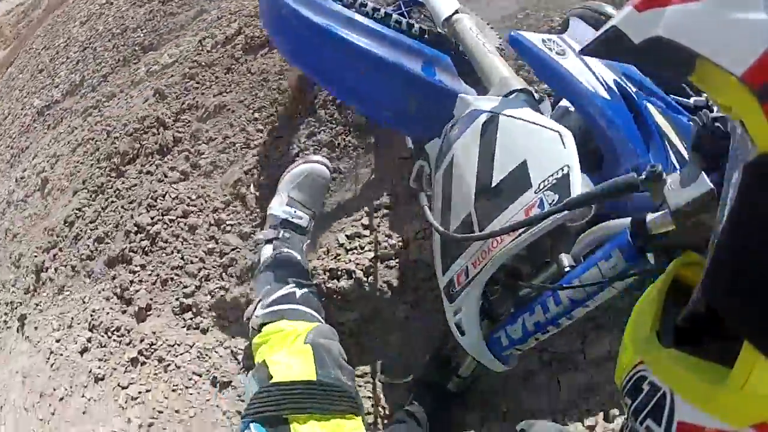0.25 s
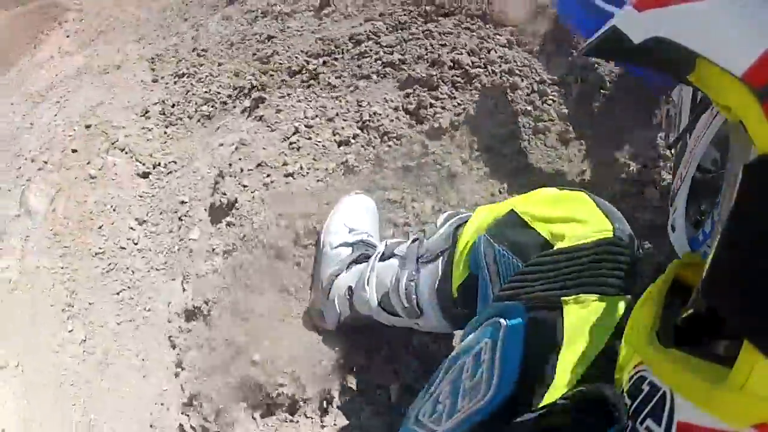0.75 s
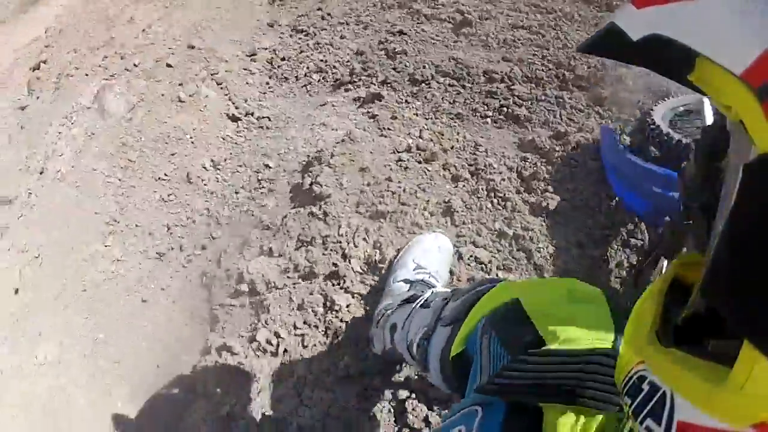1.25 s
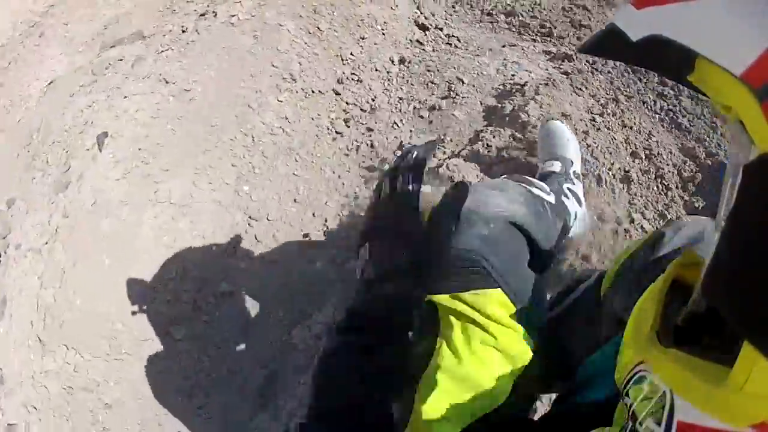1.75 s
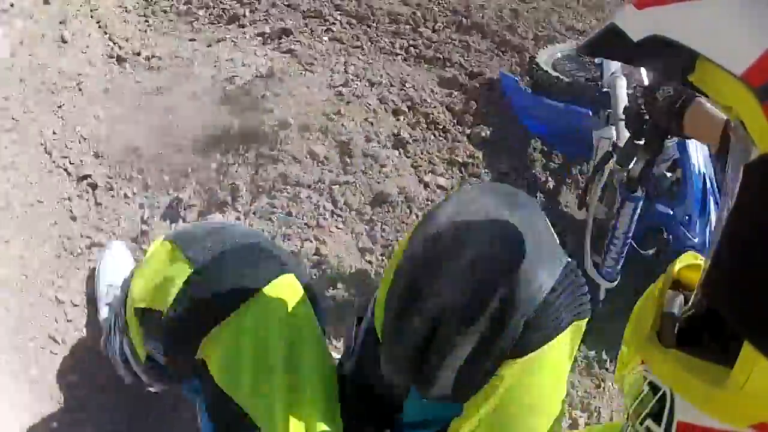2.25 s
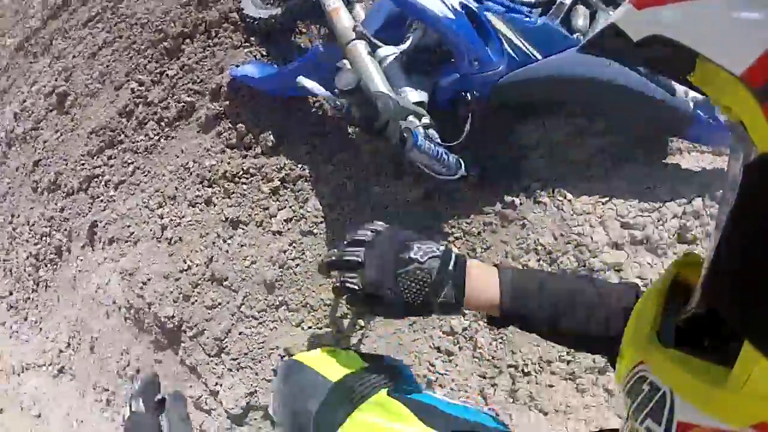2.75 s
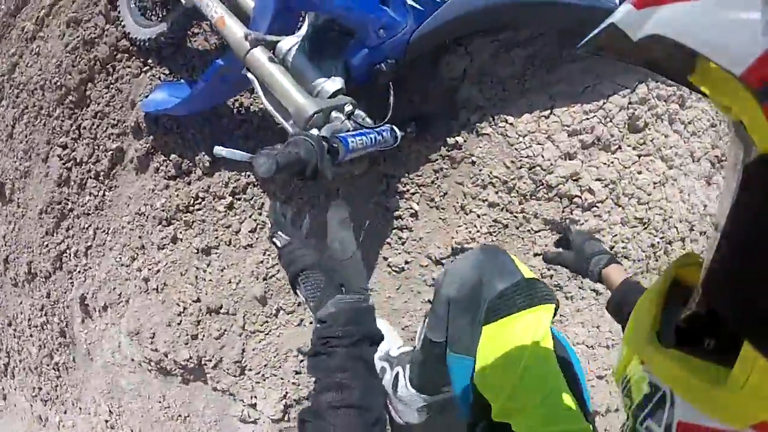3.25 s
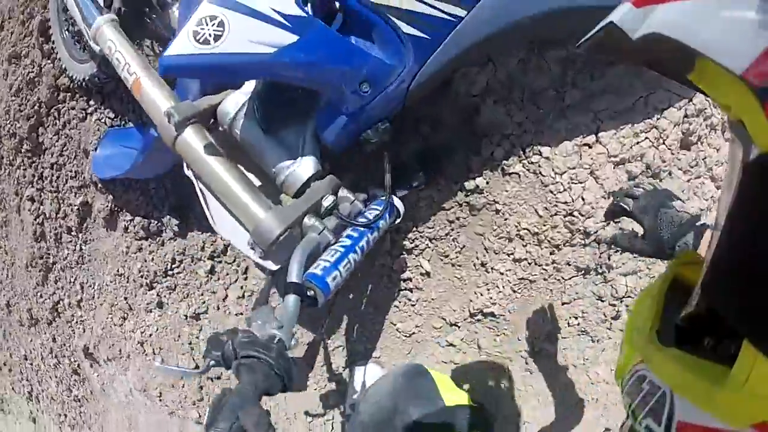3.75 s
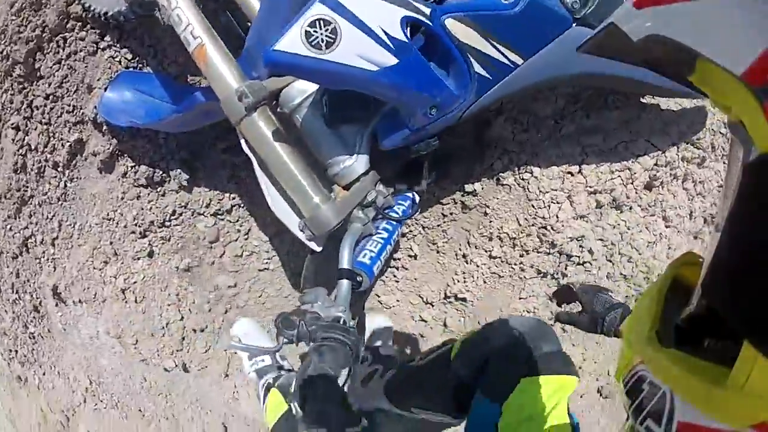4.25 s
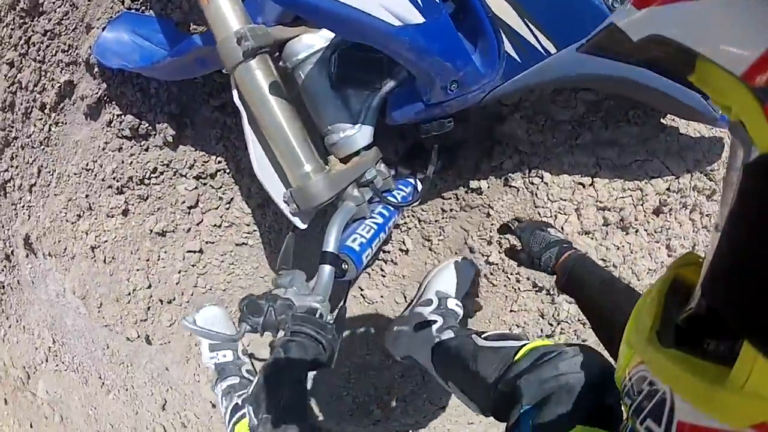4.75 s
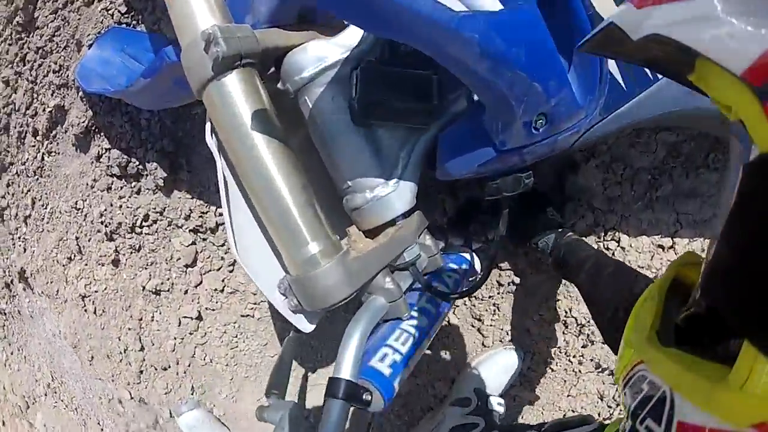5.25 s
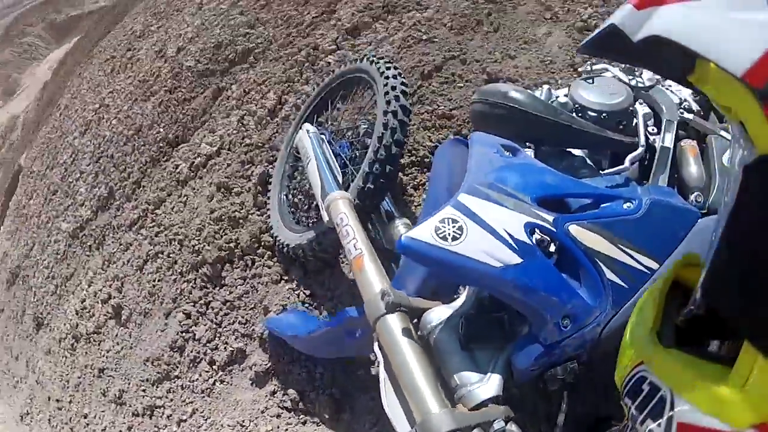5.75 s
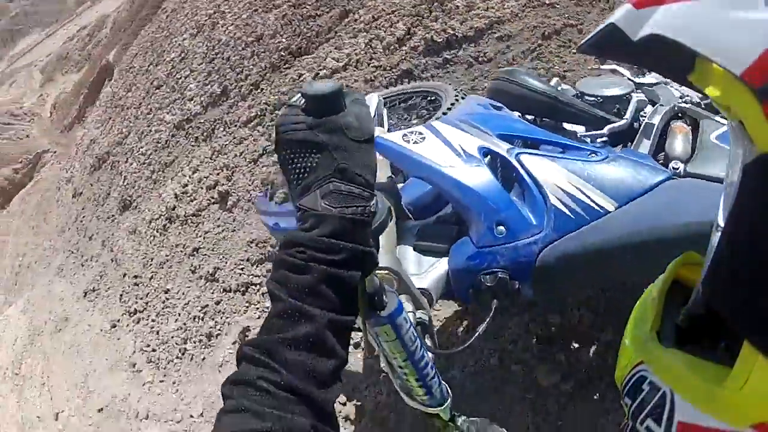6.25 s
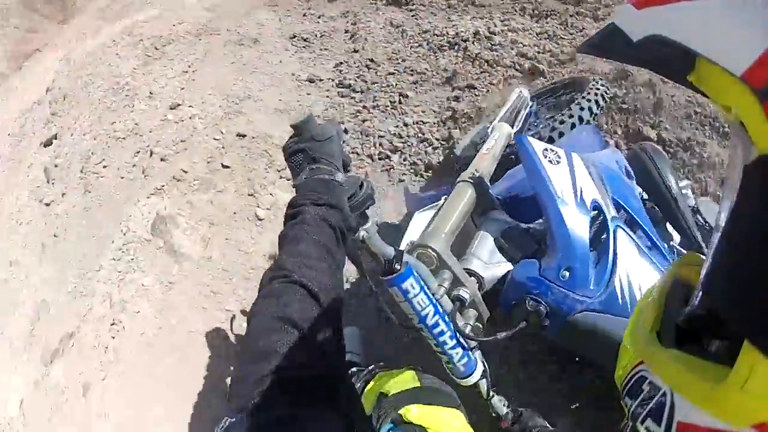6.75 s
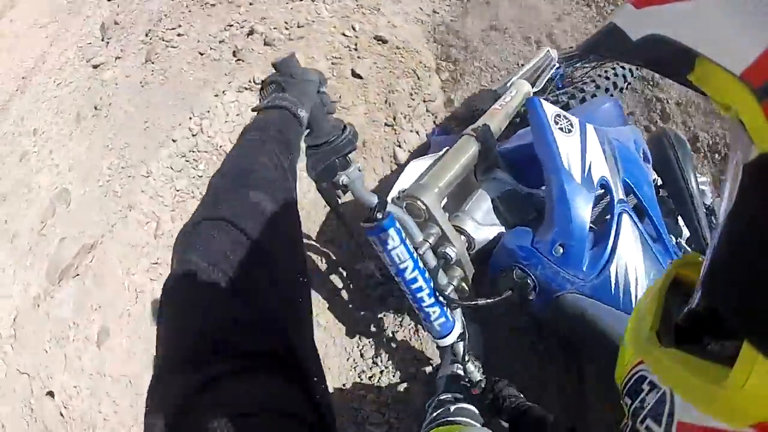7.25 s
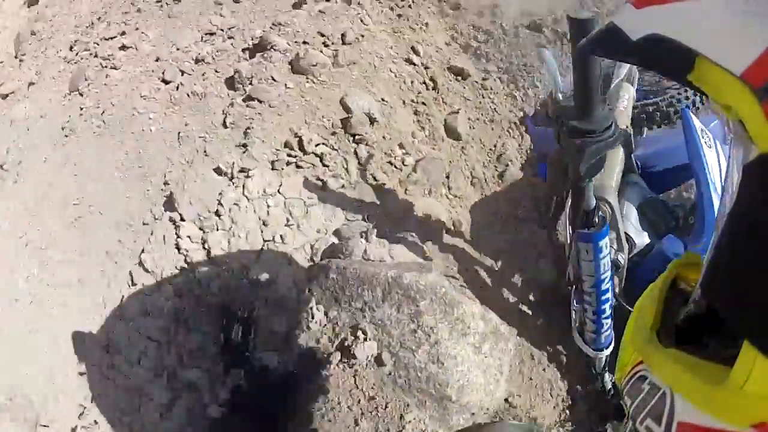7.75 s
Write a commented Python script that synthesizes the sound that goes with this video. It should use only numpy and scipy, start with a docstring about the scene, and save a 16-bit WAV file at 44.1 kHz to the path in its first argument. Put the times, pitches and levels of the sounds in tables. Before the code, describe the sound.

Muffled boomy rubbing and thin gritty scraping on dry rocky ground, with wind buffeting, small stone snaps, faint squeaks and a burst of hard knocks at the end.

```python
"""Boots scrape and slide on loose stony dirt while a heavy machine is dragged, heard by a helmet camera
in a closed case. Sliding stones are random grains, passed as a boomy rub and a thin gritty band above.
Knocks are short decaying tones, pebble ticks are snaps with a spray of grains, a lever squeaks in rising
sines, and wind buffets the case as lumpy low noise. The sound is sampled coarsely and held, so it shows
again as mirror images in the treble."""
import sys
import numpy as np
from scipy import signal
from scipy.fft import rfft, irfft, next_fast_len
from scipy.io import wavfile
from scipy.ndimage import uniform_filter1d, map_coordinates

SR = 44100
rng = np.random.default_rng(int(sys.argv[2]) if len(sys.argv) > 2 else 0)


def put_to_file(sound):
    """Save the sound as 16-bit audio at rate SR, in the file named by the first command-line argument."""
    columns = np.atleast_2d(sound).T  # one column per channel
    safe = np.clip(columns, -1, 1)
    whole_steps = np.round(safe * 32767)
    wavfile.write(sys.argv[1], SR, whole_steps.astype(np.int16))


def magnitude_from_level(level_db):
    """Linear magnitude for a level in decibels (20 dB per decade)."""
    exponent = np.asarray(level_db, float) / 20
    return 10 ** exponent


N = 352800

# boomy band of the case wall: pitch_hz, level_db (relative)
CASE_BAND = [(71, -49.5), (120, -5.5), (200, 0), (338, -1.5), (489, -2), (530, -2.5), (586, -2.5),
             (806, -16), (872, -25), (1300, -26), (1690, -33), (2860, -120)]
# thin band of the finest grains: pitch_hz, level_db (relative)
SAND_BAND = [(1940, -43), (3300, -1.5), (3830, 1), (4020, 2.5), (4400, -3), (4780, 1), (5260, -2.5),
             (6000, -4.5), (7800, -57), (13200, -120)]


def unit(x):
    """Scaled to rms 1."""
    return x / np.sqrt(np.mean(x ** 2) + 1e-20)


def curves(rows):
    """One value per sample for each column after the time."""
    s, *cols = np.transpose(rows)
    return [np.interp(np.arange(N) / SR, s, c) for c in cols]


def wobble(rate):
    """A smooth random curve, rate knots a second."""
    knots = rng.standard_normal(int(N * rate / SR) + 4)
    return map_coordinates(knots, [np.arange(N) * rate / SR])


def filtered(x, response):
    """x times a response of frequency."""
    m = 2 * next_fast_len(N // 2 + 4096)  # room for the ringing
    return irfft(rfft(x, m) * response(np.fft.rfftfreq(m, 1 / SR)), m)[..., :N]


def coloured(x, spectrum):
    """x through (Hz, dB) points, ringing only after each stroke (minimum phase), brought to rms 1."""
    hz, db = np.transpose(spectrum)

    def causal(f):
        gain = magnitude_from_level(np.interp(np.log(f + 1), np.log(hz + 1), db))
        cepstrum = irfft(np.log(gain + 1e-5))
        # fold the part before time zero onto the part after it
        cepstrum[1:len(f) - 1] *= 2
        cepstrum[len(f):] = 0
        return np.exp(rfft(cepstrum))
    return unit(filtered(x, causal))


def crumble(rate, spread_db, share, clump_db, clump_rate):
    """Stones breaking loose in clumps, a few large among many small, over a smooth slide of dust."""
    chance, size, sign = rng.random((3, N))
    loose = chance < rate / SR  # rate stones a second
    stones = loose * magnitude_from_level(-spread_db * np.log(size + 1e-4)) * np.sign(sign - .5)
    share = np.clip(share, 0, 1)  # of the power, in the stones
    mix = np.sqrt(share) * unit(stones) + np.sqrt(1 - share) * rng.standard_normal(N)
    return mix * magnitude_from_level(clump_db * wobble(clump_rate))


def patchy(x, depth_db):
    """Stones of different sizes take turns: random patches of gain in time and pitch."""
    z = signal.stft(x, nperseg=256)[2]
    field = uniform_filter1d(rng.standard_normal(z.shape), size=3, axis=0)
    field = uniform_filter1d(field, size=5, axis=1)
    return signal.istft(z * magnitude_from_level(depth_db * unit(field)), nperseg=256)[1][:N]


def bursts(s, length, db, rise, under_db):
    """Gain of rounded swells standing on a steady level, their powers added; rise is over fall time."""
    t = np.arange(0, N / SR + .01, .001)
    u = (t - s[:, None]) / np.maximum(length, .003)[:, None]
    power = magnitude_from_level(2 * db) @ np.exp(-2 * np.where(u < 0, u / rise, u) ** 2)
    return np.sqrt(np.interp(np.arange(N) / SR, t, power) + magnitude_from_level(2 * under_db))


def swell(s, db, rise, t60):
    """Level of one blow: a soft rise, then a fall."""
    t = np.clip(np.arange(N) / SR - s, 0, 1)
    shape = magnitude_from_level(-60 * t / max(t60, .004)) * (1 - np.exp(-t / max(rise, 1e-4))) ** 2
    return magnitude_from_level(db) * shape / shape.max()


def snaps(times, db, spectrum):
    """One hard contact at each time, coloured by the band it comes through."""
    strokes = np.bincount(np.round(times * SR).astype(int), magnitude_from_level(db), N)
    hits = coloured(strokes, spectrum)
    return hits * magnitude_from_level(db.max()) / abs(hits).max()


def scrape():
    """The same kind of sliding stones shake the case, heard as a rub, and hiss through its seal."""
    # middle and coarse bands of the hiss: pitch_hz, level_db (relative)
    grit_band = [(1000, -39.5), (1600, -5.5), (2000, 2), (2500, 2), (3100, 1), (3350, -8.5), (3800, -16.5),
                 (4600, -35), (8000, -120)]
    gravel_band = [(500, -30.5), (850, 2), (1140, -1.5), (1500, -6), (1800, -17), (2400, -32), (3800, -120)]
    # the steady slide: time_s, grit_db, weight_db (rub over grit), stone_size (-1 fine to 1 coarse)
    slide = [(0, -58.5, 14.5, 0), (.32, -55, 18.5, 0), (.64, -56.5, 14, -0.37), (.9, -58, 17, -0.27),
             (1.3, -59, 18.5, -0.14), (1.56, -61, 16, -0.2), (2.05, -56, 10.5, -0.59),
             (2.45, -63.5, 16, -0.39), (2.95, -61.5, 16.5, 0), (3.3, -65.5, 17, 0), (3.55, -64, 17.5, 0.19),
             (3.74, -62, 11, -0.2), (3.86, -66, 13.5, -.3), (4.2, -67, 15.5, -.2), (4.68, -69, 14, -0.26),
             (4.9, -64, 16.5, 0.18), (5.17, -62, 18, 0), (5.35, -64, 18, -0.036), (5.7, -62, 16, -0.028),
             (6.0, -58, 15, -.3), (6.33, -63.5, 18.5, 0.049), (6.45, -55.5, 19, 0.36),
             (6.72, -56.5, 18, 0.38), (7.0, -52, 17, -0.13), (7.3, -51, 15.5, 0.086),
             (7.58, -56, 18.5, -.2), (7.78, -48, 16, 0.089), (7.9, -56, 18, -0.12), (8, -50.5, 9, -0.093)]
    # boot scuffs: peak_s, length_s, grit_db, gravel_db (over grit), sand_db (over grit)
    scuffs = [(0.692, 0.041, -50.5, -9, -6), (0.738, 0.043, -48.5, 1.5, -8), (1.137, 0.017, -53, 5, -2),
              (1.203, 0.027, -57.5, 10.5, -3), (1.249, 0.023, -59.5, 13.5, -3),
              (1.668, 0.098, -54, -1.5, -17), (1.804, 0.01, -57, -14, -7), (1.851, .02, -55.5, -2, -9),
              (1.94, .015, -42.5, 0.5, -9), (2.17, 0.034, -47.5, -17, -2.5), (2.355, 0.028, -54.5, -7, -9),
              (2.684, 0.015, -46.5, -4, -14), (3.378, 0.025, -58.5, -3, -24),
              (4.079, 0.023, -52.5, -2.5, -16), (4.253, 0.032, -66, -5, -10), (4.46, 0.033, -66, -14, -5),
              (4.827, 0.062, -60.5, -7, -9), (5.428, 0.062, -61, 6.5, -5), (5.832, .04, -55.5, -3, -19),
              (5.885, 0.059, -55, 2, -7.5), (6.114, 0.017, -52, -4, -21), (6.397, 0.016, -49.5, -0.5, -17),
              (6.758, 0.03, -48.5, 3.5, -9), (6.838, .04, -54, 4, -18), (6.973, .05, -54, -5, -9),
              (7.06, .035, -52.5, -6, -3), (7.103, 0.012, -53, 10, -2), (7.189, 0.045, -47, 1.5, -19),
              (7.296, .02, -48.5, 0.5, -10), (7.344, 0.01, -36.5, -1, -14), (7.408, 0.022, -46.5, 1, -12),
              (7.46, 0.013, -43, 2, -10.5), (7.635, 0.018, -47, -10, -9), (7.716, 0.018, -48, -9, -12),
              (7.769, 0.033, -44.5, 0, -13), (7.816, 0.042, -39, -7, -9), (7.941, 0.027, -46, -11, -5),
              (7.997, 0.018, -50, 7, -8)]
    # heaves of the load that shake the case: peak_s, length_s, level_db
    heaves = [(0.735, 0.057, -34), (1.233, .03, -35.5), (1.32, 0.015, -43), (1.686, 0.078, -35),
              (1.926, 0.11, -40), (2.35, .022, -26.5), (2.445, .03, -43), (2.692, .03, -39),
              (3.044, 0.046, -45.5), (3.242, 0.041, -40.5), (3.387, 0.032, -42), (3.484, 0.013, -37.5),
              (3.95, 0.045, -47.5), (4.087, 0.025, -33.5), (4.434, .035, -43), (4.833, 0.087, -42.5),
              (5.053, 0.08, -45), (5.44, 0.044, -35), (5.55, 0.063, -42.5), (5.65, .04, -46),
              (5.873, 0.048, -45), (6.452, 0.079, -35), (6.577, .03, -37), (6.758, 0.021, -27),
              (6.986, 0.017, -40.5), (7.074, 0.043, -29), (7.163, .015, -25), (7.198, 0.019, -25),
              (7.348, 0.05, -33.5), (7.403, 0.027, -28.5), (7.464, .016, -23.5), (7.513, 0.011, -34),
              (7.641, 0.018, -31), (7.776, 0.073, -28.5), (7.93, .03, -35), (7.997, 0.016, -26.5)]

    slip = magnitude_from_level(0.62 * wobble(30))  # stick and slip shared by all sizes of stone
    coarse = crumble(rate=400, spread_db=2.5, share=0.32, clump_db=1.64, clump_rate=54)
    rub = coloured(slip * coarse, CASE_BAND)
    fine = crumble(rate=1000, spread_db=1.86, share=0.39, clump_db=0.68, clump_rate=90)
    fine = patchy(slip * fine, depth_db=1.54)

    slide_db, weight_db, size = curves(slide)
    s, length, db, gravel_db, sand_db = np.transpose(scuffs)
    # band, level over the grit in the scuffs and in the slide, dB: coarse stones favour gravel
    layers = ((gravel_band, gravel_db, -1.5 + 5 * size),
              (grit_band, 0, 0),
              (SAND_BAND, sand_db, -8 - 6.5 * size))
    hiss = np.zeros(N)
    for band, over_db, under_db in layers:
        gain = bursts(s, length, db + over_db, rise=0.86, under_db=slide_db + under_db)
        hiss += gain * coloured(fine, band)

    rub_db = slide_db + weight_db + 1.63 * wobble(14)
    return bursts(*np.transpose(heaves), rise=.8, under_db=rub_db) * rub + hiss


def knocks():
    """The case wall rings briefly at each dull knock and rattles in its own boomy band."""
    # knocks on the case, before the wall: start_s, level_db, pitch_hz, decay_s (nominal, by 60 dB)
    blows = [(0.671, -27.5, 530, 0.06), (0.728, -23, 600, 0.035), (1.2371, -33, 384, 0.017),
             (1.2902, -23, 280, 0.023), (1.916, -21.5, 326, 0.019), (1.9404, -19.5, 337, 0.026),
             (2.3343, -19.5, 440, 0.018), (2.3456, -16, 327, 0.015), (2.6054, -23.5, 336, 0.013),
             (2.659, -20, 465, 0.01), (2.7249, -24, 490, 0.01), (2.7595, -33, 613, 0.017),
             (2.8045, -26, 494, 0.018), (2.8877, -20, 450, 0.012), (2.9276, -23.5, 395, 0.0059),
             (3.2552, -26, 405, 0.012), (3.3873, -24, 540, 0.0097), (3.546, -30.5, 475, 0.0093),
             (4.073, -18.5, 505, 0.0099), (4.319, -31.5, 686, 0.009), (5.415, -36, 299, 0.011),
             (6.062, -30, 371, 0.0037), (6.3839, -26, 404, 0.041), (6.6114, -14.5, 410, 0.013),
             (6.7467, -12, 300, 0.011), (6.7545, -15.5, 182, 0.045), (6.7613, -15.5, 186, 0.043),
             (7.049, -24.5, 463, 0.035), (7.1599, -9, 620, 0.012), (7.184, -16, 430, 0.0091),
             (7.3488, -11.5, 600, 0.045), (7.4063, -12, 530, 0.02), (7.462, -18, 402, 0.008),
             (7.628, -18, 450, 0.0078), (7.7614, -15, 388, 0.02), (7.7818, -14.5, 312, 0.019),
             (7.834, -10, 605, 0.0072), (7.9282, -25, 670, 0.019), (7.9921, -18.5, 250, 0.018)]
    rattle = coloured(rng.standard_normal(N), CASE_BAND)
    t = np.arange(N) / SR
    out = np.zeros(N)
    for s, db, hz, t60 in blows:
        ring = np.sin(2 * np.pi * hz * (t - s))
        out += swell(s, db, 0.00085, t60) * (0.81 * ring + 0.19 * rattle)
    return filtered(out, lambda f: 1 / np.hypot(1, (f / 900) ** 5))  # the wall stops the treble


def ticks():
    """Each pebble snaps once and sheds a short spray of grains; random patches tint the snaps."""
    # pebble ticks and crunches, before the mix of snap and spray:
    # start_s, grit_db, edge_db (sharp edge, in the sand band), decay_s (nominal, by 60 dB)
    pebbles = [(0.1316, -33.5, -50, 0.01), (0.6787, -35.5, -46, 0.017), (1.133, -38, -47, 0.021),
               (1.233, -44, -54, 0.019), (1.799, -43.5, -62, 0.053), (1.85, -51, -56, 0.048),
               (1.942, -24.5, -38, 0.012), (2.682, -34, -38, 0.029), (2.9266, -39, -71, 0.014),
               (3.0205, -43, -68, 0.011), (3.0822, -51, -58, 0.011), (3.321, -45, -64, 0.008),
               (4.073, -49, -57, 0.046), (4.315, -38.5, -45, 0.017), (4.3384, -50, -73, 0.008),
               (4.3493, -53, -66, 0.014), (4.523, -53, -62, 0.029), (5.6336, -50, -52, 0.022),
               (5.6458, -42, -55, 0.013), (5.6559, -52, -51, 0.011), (5.667, -54, -52, 0.02),
               (5.6878, -42, -51, 0.011), (5.7208, -46, -46, 0.011), (5.771, -49, -51, 0.01),
               (5.8042, -48, -49, 0.013), (5.8284, -38.5, -55, 0.022), (5.8415, -42, -42.5, 0.009),
               (5.9562, -49, -55, 0.023), (5.9693, -49, -53, 0.009), (6.0856, -34, -43, 0.011),
               (6.1058, -40, -47, 0.017), (6.12, -44, -53, 0.02), (6.24, -46, -64, 0.027),
               (6.6105, -40, -66, 0.011), (6.743, -27, -55, 0.024), (7.0893, -52, -40.5, 0.053),
               (7.1601, -31, -54, 0.02), (7.2539, -35.5, -45, 0.015), (7.345, -25.5, -38, 0.026),
               (7.399, -29.5, -40, 0.036), (7.452, -29.5, -46, 0.016), (7.6255, -30, -41, 0.021),
               (7.756, -29, -50, 0.011), (7.8281, -16, -27, 0.012), (7.8353, -10.5, -24.5, 0.0097),
               (7.843, -23, -33, 0.0079), (7.8904, -38, -49, 0.008), (7.9287, -20, -28.5, 0.007)]
    # band of the pebble grit: pitch_hz, level_db (relative)
    pebble_band = [(500, -33.5), (900, -5), (1400, -1), (2000, 0.5), (3100, -0.5), (3500, -14.5),
                   (4600, -37), (8000, -120)]
    s, grit_db, edge_db, t60 = np.transpose(pebbles)
    spray = crumble(rate=3200, spread_db=3.0, share=0.44, clump_db=1, clump_rate=250)
    hard = np.clip(0.0087 / t60, 0, .9)  # the longer the event, the weaker its snap
    out = np.zeros(N)
    for db, band in ((grit_db, pebble_band), (edge_db, SAND_BAND)):
        snap = snaps(s, db + 20 * np.log10(hard), band)
        out += magnitude_from_level(2.0) * patchy(snap, depth_db=1.1)
        spray_gain = sum(swell(a, b, 0.00018, c) for a, b, c in zip(s, db, t60))
        out += magnitude_from_level(-3.5) * spray_gain * coloured(spray, band)
    return out


def lever():
    """Short rising squeaks of a dry pivot: faint sines, unsteady in level and pitch."""
    # one row a slip: start_s, length_s, first_pitch_hz, last_pitch_hz, level_db (before the flutter)
    squeaks = [(5.865, .05, 2150, 3550, -59), (6.04, .075, 2780, 3180, -52.5),
               (6.112, .07, 3200, 3680, -55), (6.185, .05, 3720, 4050, -65), (6.26, .2, 5300, 5800, -72)]
    peak_at, ends_db = .35, -12  # share of the length before the peak, both ends against the peak
    out = np.zeros(N)
    for s, length, first_hz, last_hz, db in squeaks:
        end = s + length
        hz, = curves([(s, first_hz), (end, last_hz)])
        level_db, = curves([(s - .01, -120), (s, db + ends_db), (s + peak_at * length, db),
                            (end, db + ends_db), (end + .01, -120)])
        gain = magnitude_from_level(level_db + 2.5 * wobble(70))
        phase = 2 * np.pi * np.cumsum(hz * (1 + 0.007 * wobble(300))) / SR
        out += gain * np.sin(phase)
    return out


def wind():
    """Eddies press on the case in uneven lumps: a slow press and a quicker flutter."""
    # colours of the slow press and the quick flutter: pitch_hz, level_db (relative)
    press_band = [(12, -29), (20, 0.5), (43, -2.5), (75, 1), (98, -25.5), (160, -120)]
    flutter_band = [(38, -49.5), (65, -1), (102, 3.5), (153, -2.5), (210, -8.5), (300, -17), (390, -53),
                    (660, -120)]
    # steady air on the case: time_s, flutter_db
    breeze = [(0, -37), (.3, -52.5), (1.1, -51), (1.55, -53.5), (2.1, -46.5), (2.5, -54), (2.9, -62),
              (3.3, -34), (3.72, -59), (4.3, -39.5), (4.75, -48.5), (5.17, -52), (5.7, -51), (6.2, -56),
              (6.6, -45), (7.3, -44), (8, -54)]
    # gusts and low shoves: peak_s, length_s, flutter_db, press_db (over flutter)
    gusts = [(0, .012, -24, -14), (.04, .04, -34.5, -8), (.22, .025, -42, 3), (.49, .05, -51, 2),
             (1.156, .03, -46.5, 8), (1.24, 0.016, -37, -15), (1.744, .05, -53, 11.5),
             (1.853, .04, -42.5, 4), (1.96, .05, -36.5, -7), (2.195, .06, -46, 6), (2.246, .02, -42, -12),
             (2.303, .05, -55.5, 15), (2.981, 0.028, -34, -4), (3.049, 0.031, -26, -3.5),
             (3.139, 0.027, -34, 1), (3.217, 0.017, -22, -2.5), (3.28, 0.061, -25.5, -8),
             (3.395, 0.038, -27, -4), (3.494, 0.024, -29.5, 2), (3.58, 0.028, -43.5, 1.5),
             (3.845, .05, -46.5, 6), (4.02, 0.061, -38, 5), (4.105, .025, -35, -11), (4.207, .035, -37, 2),
             (4.345, 0.055, -30.5, -9), (4.46, 0.05, -36.5, -7), (4.564, .025, -35.5, -8),
             (4.627, 0.029, -48, 13.5), (4.69, 0.018, -42.5, 12), (4.82, 0.032, -40, 9.5),
             (4.878, 0.033, -35.5, 4.5), (4.937, .03, -32, -12), (5.01, 0.043, -39, 9),
             (5.252, 0.024, -37.5, -3), (5.328, 0.036, -41.5, 7), (5.39, 0.034, -41.5, 0),
             (5.563, 0.032, -41, 9), (5.641, .025, -34, 9.5), (5.724, 0.084, -41, 5.5),
             (5.863, .05, -49.5, 8.5), (6.408, 0.041, -33.5, -1), (6.475, .03, -32.5, -4),
             (6.752, 0.038, -32, -20), (6.867, 0.12, -39.5, 3.5), (7.175, 0.037, -30.5, -23),
             (7.43, 0.062, -30, -24), (7.624, 0.048, -37.5, -4), (7.76, 0.074, -35, -3.5),
             (7.886, 0.033, -40, -2)]
    s, length, db, slow_db = np.transpose(gusts)
    breeze_db, = curves(breeze)
    lumps = rng.standard_normal(N) * magnitude_from_level(0.86 * wobble(15) + 1.64 * wobble(45))
    slow_breeze_db = breeze_db - 2.5 + 3 * wobble(12)
    press = bursts(s, length, db + slow_db, rise=1, under_db=slow_breeze_db)
    flutter = bursts(s, length, db, rise=1, under_db=breeze_db)
    return press * coloured(lumps, press_band) + flutter * coloured(lumps, flutter_band)


def scene():
    """Everything reaches one microphone inside the case."""
    return (scrape() + knocks() + ticks() + lever() + wind())[None]


def low_pass(x):
    """Removes everything above the highest recorded frequency."""
    return signal.sosfilt(signal.butter(12, 16510, fs=SR, output="sos"), x)


def record(dry):
    """Held samples mirror the sound around the sampling rate, weakest close to it."""
    hold_hz, top_hz = 12000, 15300  # sampling rate of the hold, upper edge of the sound
    base = filtered(dry, lambda f: 1 / np.hypot(1, (f / 5600) ** 24))  # filter before sampling
    shifted = base * 2 * np.cos(2 * np.pi * hold_hz * np.arange(N) / SR)

    def image_gain(f):
        d = abs(f - hold_hz)
        bass_lift = np.hypot(d, 110) / np.hypot(d, 60)  # the mirrors of the bass are a little stronger
        return bass_lift * d / (f + 1) * (f > hold_hz / 2)

    images = filtered(shifted, image_gain)
    mix = filtered(base + images, lambda f: 1 / np.hypot(1, (f / top_hz) ** 160))
    return low_pass(mix)


dry = scene()
out = record(dry)
put_to_file(out)
```